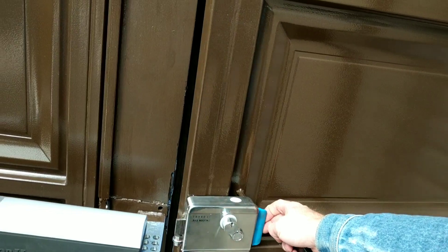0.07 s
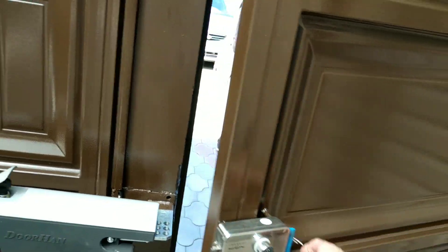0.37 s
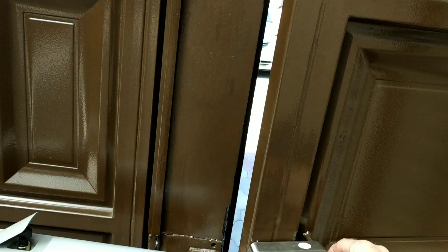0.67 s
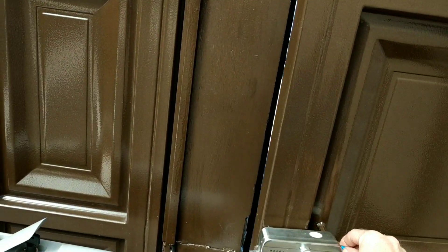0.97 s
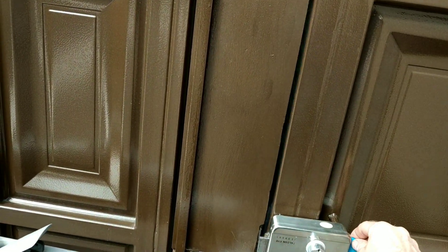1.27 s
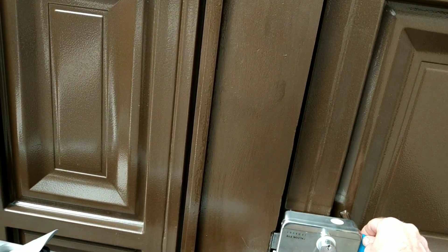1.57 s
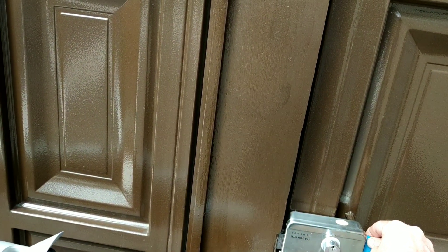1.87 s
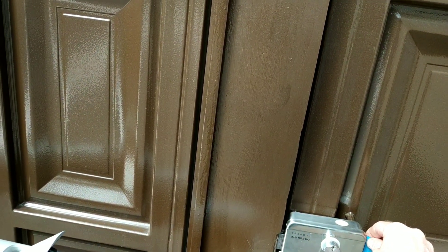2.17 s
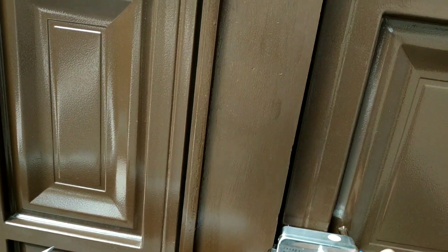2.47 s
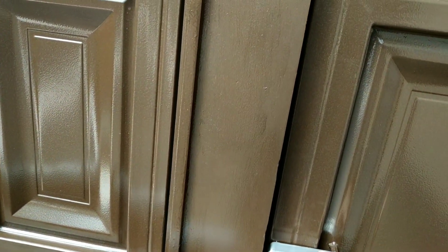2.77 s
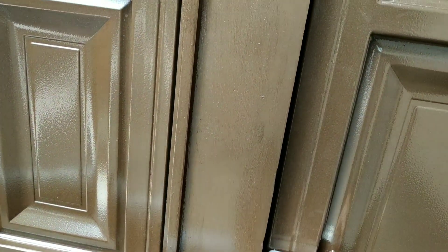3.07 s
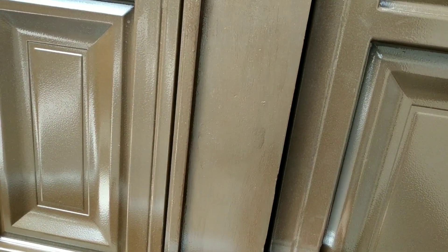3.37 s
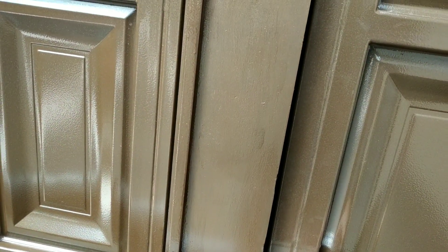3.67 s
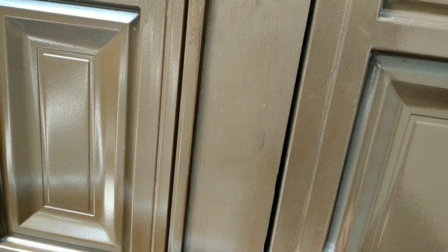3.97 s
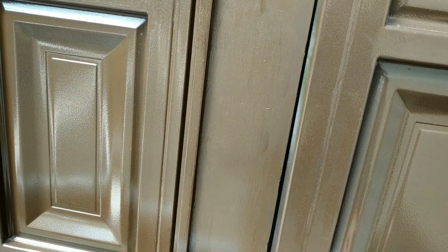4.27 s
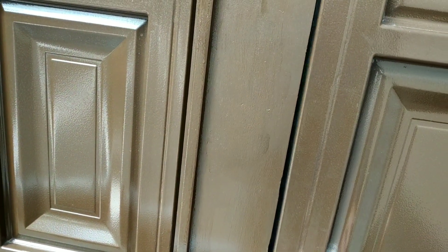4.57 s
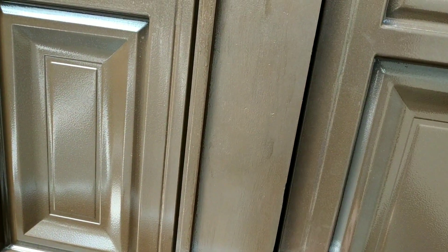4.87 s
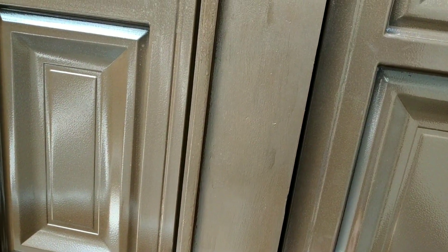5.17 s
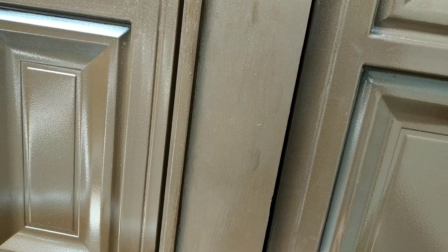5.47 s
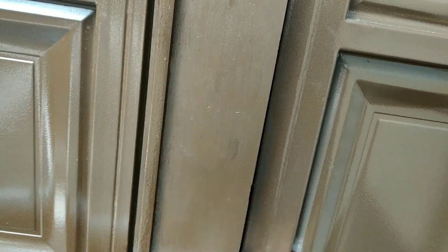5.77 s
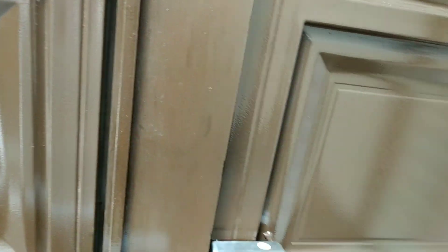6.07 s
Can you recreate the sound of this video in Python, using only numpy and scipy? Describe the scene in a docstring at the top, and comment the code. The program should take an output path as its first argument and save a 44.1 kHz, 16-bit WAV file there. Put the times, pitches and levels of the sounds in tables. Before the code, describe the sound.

In an echoing entrance passage, a hollow metal gate is pushed shut at close range with a sharp clang and a short boom. Its spring bolt snaps, then lets go with a loud clack, dragging and rattling before the gate bangs shut again and the latch snaps once more. Light handle ticks fall in between, while faint street rumble, soft sleeve rustle and low wind flutter on the microphone continue underneath.

```python
"""Wind puffs and a sleeve rustles over a faint street; then a sheet-steel gate clangs shut at close range.
It stands in an echoing entrance passage and is pushed shut twice and unlatched again. The bolt pings on
the strike, the hollow leaf booms against its frame and rocks; the spring latch snaps, drags and chatters.
The microphone is a phone's stereo pair, its ports in the draught; a limiter ducks after loud clacks."""
import sys
import numpy as np
from scipy import signal
from scipy.fft import rfft, irfft, next_fast_len
from scipy.io import wavfile
from scipy.ndimage import uniform_filter1d, map_coordinates

SR = 44100
rng = np.random.default_rng(int(sys.argv[2]) if len(sys.argv) > 2 else 0)


def dump_mix(stems):
    """Bounce the given channels to the path in sys.argv[1] as a 16-bit WAV at rate SR."""
    frames = np.atleast_2d(stems).T  # one column per channel
    limited = np.clip(frames, -1, 1)  # hard clip at full scale
    pcm = np.round(limited * 32767).astype(np.int16)
    wavfile.write(sys.argv[1], SR, pcm)


N = 273861


# the gate pushed shut, close to the microphone: (bolt meets strike [s], leaf seats [s], force [dB],
# leaf boom [dB], frame clank on seating [dB])
SLAMS = [(1.382, 1.4387, 0.5, -0.5, -36), (4.686, 4.7383, -1, -1.5, -20)]

def slam(s, seat_s, db, boom_db, judder_s=.011):
    """The bolt judders up its bevel, each clack softer and duller; then the leaf seats."""
    hits = []
    for k in range(4):
        judder_boom_db = boom_db - (18.5 if k == 0 else 14)  # the first touch shakes the leaf less
        hits.append((s + k * judder_s, db - 9.5 - 3.5 * k, 0.019, 0.5 - k, judder_boom_db))
    seating = (seat_s, db - 10, 0.0097, -2.5, boom_db - 31)
    return hits + [seating]


# the spring bolt let go: (time [s], clack [dB], chatter decay [s], tilt [dB/octave], leaf boom [dB],
# scrape lead [s], scrape [dB], twang [dB])
SNAPS = [(1.862, -8, 0.0097, 0.5, -21, 0.014, -21, -8.5), (3.369, 5, .013, 1, -20.5, 0.018, -11, -25),
         (3.888, -9, .006, 0.8, -41, 0.0039, -41, -25), (3.9268, -10, .007, 1.3, -51, 0.005, -21, -20.5),
         (5.064, -1, 0.0051, 0.3, -20, 0.008, -19, -32)]

def snap(s, db, decay_s, tilt_db, boom_db, scrape_s, scrape_db):
    """The bolt scrapes free, hits its stop and bounces once, shorter and 2 dB stronger."""
    start_and_grip = [(s - scrape_s, scrape_db - 1), (s - .6 * scrape_s, scrape_db)]
    scrapes = [(at_s, rub_db, 0.015, 1.4, rub_db - 12.5) for at_s, rub_db in start_and_grip]
    stop = (s, db, decay_s, tilt_db, boom_db)
    bounce = (s + .7 * decay_s, db + 2, .7 * decay_s, tilt_db, boom_db + 2)
    return scrapes + [stop, bounce]


# the seated leaf rocks against its frame: (time [s], leaf boom [dB], frame clank [dB])
ROCKS = [(1.466, -19.5, -33), (1.483, -14.5, -20), (1.518, -30, -38), (1.558, -17.5, -47),
         (4.756, -13.5, -32), (4.77, -15, -33), (4.82, -17, -36), (4.876, -33, -34)]
# the loose leaf knocks in its frame: (time [s], clack [dB], chatter decay [s], tilt [dB/octave],
# leaf boom [dB], frame clank [dB])
KNOCKS = [(1.699, -52, .011, 5, -22, -52), (1.971, -31, .011, -1.5, -20, -34),
          (3.591, -21.5, 0.013, -5.5, -19, -28), (3.655, -30, 0.018, -6.5, -20, -39),
          (3.797, -20.5, 0.019, -5, -32, -26.5), (3.808, -21, 0.017, -3, -42, -27),
          (3.833, -22.5, 0.012, -4, -40, -31), (3.8644, -12.5, 0.0043, -1, -35, -32),
          (3.868, -27.5, 0.026, 7.5, -16.5, -23), (5.031, -44, 0.02, 6, -20.5, -46),
          (5.273, -28.5, 0.011, -3.5, -36, -50)]

def contacts():
    """Steel meets steel: (time [s], clack [dB], chatter decay [s], tilt [dB/octave], leaf boom [dB])."""
    slams = [hit for *row, _ in SLAMS for hit in slam(*row)]
    snaps = [hit for *row, _ in SNAPS for hit in snap(*row)]
    dull_rocks = [(s, -29, 0.0077, -7, boom_db) for s, boom_db, _ in ROCKS]
    return slams + dull_rocks + snaps + [row[:-1] for row in KNOCKS]


# light ticks of the handle and lock: (time [s], level [dB])
HANDLE_TICKS = [(2.085, -48), (2.55, -41), (2.972, -34), (3.246, -41.5), (4.214, -47), (5.495, -44.5),
                (6.123, -40.5), (6.152, -35.5)]

def clacks(hits):
    """Bolt, strike and leaf chatter at each contact; the strike cracks on a slam; the handle ticks."""
    out = np.zeros((2, N))
    for s, db, decay_s, tilt_db, _ in hits:
        add(out, s, amp(db) * steel_ripple(chatter(decay_s, tilt_db)))
    for s, _, db, *_ in SLAMS:
        add(out, s + .002, amp(db - 3.5) * chatter(decay_s=.003, tilt_db=3, rise_s=0.0017))
    for s, db in HANDLE_TICKS:
        add(out, s, amp(db) * chatter(decay_s=0.021, tilt_db=1, rise_s=0.00066))
    return out


# steel contact heard close up: (frequency [Hz], spectrum level [dB])
CLACK_SPECTRUM = [(30, -40), (120, -25), (300, 3), (800, 1), (1700, -0.5), (2700, 2), (5000, 0),
                  (8000, -2.5), (12000, -2), (16000, -11.5)]

def chatter(decay_s, tilt_db, rise_s=0.0032, spiky_db=3.5):
    """Steel rattling on steel: a dying burst of uneven micro-impacts."""
    t = np.arange(SR // 8) / SR
    roughness = unit(uniform_filter1d(rng.standard_normal(len(t)), size=24))
    grains = unit(amp(spiky_db * roughness))
    return noise(CLACK_SPECTRUM, len(t), tilt_db) * grains * attack(t, rise_s) * np.exp(-t / decay_s)


def steel_ripple(clack, depth_db=2.5, ring_s=0.0038, from_hz=2030):
    """The steel's crowded upper modes lay fine peaks on a clack, different at each point of contact."""
    t = np.arange(SR // 32) / SR
    burst = rng.standard_normal(len(t)) * np.exp(-t / ring_s)
    modes = high_pass(burst, from_hz, order=2)
    def ripple(hz):
        peaks = rfft(modes, 2 * len(hz) - 2) * np.sqrt(2) / np.linalg.norm(modes)
        return amp(depth_db * peaks)
    return unit(filtered(clack, ripple)) * np.sqrt(np.mean(clack ** 2))


# the hollow leaf's modes: (frequency [Hz], relative level [dB], t60 [s])
LEAF_MODES = [(158.4, -14.5, 0.74), (230.6, -5.5, 0.39), (248.9, 0, 0.56), (273.3, -0.5, 0.31),
              (288.8, 1, 0.33), (381.6, 0.5, 0.22), (409, -14, 0.21), (447.3, -4, 0.29), (505, -5.5, 0.58),
              (550, -11, 0.22), (655, -22, 0.23), (737, -8, 0.097), (900, -18, 0.29)]
# its sheet panels: (frequency [Hz], spectrum level [dB])
PANEL_SPECTRUM = [(30, -56), (110, -42), (170, -18), (245, 9), (450, 7), (640, -42), (900, -38),
                  (1400, -29), (2000, -9), (6000, -16.5), (16000, -93)]

def leaf(hits, shudder_t60=0.18):
    """Each blow spreads through the hollow leaf: clear modes over a dense shudder of its panels."""
    out, t = np.zeros((2, N)), np.arange(SR // 2) / SR
    for s, *_, boom_db in hits:
        modes = amp(-11.5) * ring(LEAF_MODES, len(t), scatter_db=4.5, drift=5.5)
        shudder = amp(-6 - 60 * t / shudder_t60) * noise(PANEL_SPECTRUM, len(t))
        add(out, s, amp(boom_db) * (modes + shudder) * attack(t, 0.0057))
    return out


# the bolt's modes: (frequency [Hz], relative level [dB], t60 [s])
BOLT_MODES = [(2277, -5, 0.038), (2540, -10, 0.036), (3556, 2.5, 0.026), (3672, 6, 0.025), (3950, 5, 0.022),
              (4200, -5, 0.057), (4660, 4.5, 0.022), (5430, -6, 0.035), (5800, -14, 0.038),
              (7440, -2.5, 0.023)]
# it hits the strike plate, on closing and as the leaf shakes: (time [s], level [dB], upper modes [dB])
BOLT_TAPS = [(1.384, -3, -4), (1.441, -18.5, 6), (1.968, -28.5, 0), (3.809, -21.5, 0), (3.837, -27, 1),
             (3.843, -31, 1.5), (4.688, -5, 2), (4.741, -19, 4.5), (5.275, -30, -7)]

def bolt_pings(upper_hz=3800):
    """The bolt pings on the strike; the share of its upper modes depends on where it is hit."""
    out, t = np.zeros((2, N)), np.arange(SR // 8) / SR
    for s, db, upper_db in BOLT_TAPS:
        modes = [(hz, mode_db + upper_db * (hz > upper_hz), t60) for hz, mode_db, t60 in BOLT_MODES]
        ping = ring(modes, len(t), scatter_db=.5, drift=4)
        add(out, s, amp(db) * ping * attack(t, 0.0023))
    return out


# the lock case's modes: (frequency [Hz], relative level [dB], t60 [s])
LOCK_MODES = [(688, 3, 0.12), (828, 5, 0.14), (1000, 7.5, 0.055), (1170, 11.5, 0.0098), (2265, 9, 0.059),
              (2590, 1, 0.12), (3870, -2, 0.12), (4650, -15, 0.057), (5440, -1, 0.076), (6760, 2, 0.14),
              (7860, 3, 0.099), (10760, 6, 0.084)]

def lock_case(hits):
    """The lock case rings faintly under the clack of each contact."""
    out = np.zeros((2, N))
    for s, db, *_ in hits:
        add(out, s, amp(db - 26) * ring(LOCK_MODES, SR // 4, scatter_db=3, drift=21.6))
    return out


def bolt_drag(start_s=3.415, length_s=.22, catches_per_s=110):
    """The freed bolt catches and slips on the strike, hardest halfway, rattling the lock case."""
    out, count = np.zeros((2, N)), int(catches_per_s * length_s)
    for k, (late, weakness) in enumerate(rng.random((count, 2))):
        travel = (k + late) / count
        force = amp(-12 - 9.8 * weakness) * np.sin(np.pi * travel)
        grit = chatter(decay_s=0.002, tilt_db=-1.7)
        rattle = amp(-27) * ring(LOCK_MODES, grit.shape[1], scatter_db=2, drift=26)
        add(out, start_s + travel * length_s, force * (grit + rattle))
    return out


# the bolt spring's modes: (frequency [Hz], relative level [dB], t60 [s])
SPRING_MODES = [(2385, -4.5, 0.044), (2600, -8, 0.037), (2685, -5, 0.079), (4570, -17, 0.1),
                (4880, -18, 0.21), (9860, -25, 0.46), (10940, -17, 0.1)]
# it twitches under the handle: (time [s], level [dB])
SPRING_TWITCHES = [(1.757, -37), (1.974, -24), (3.603, -20), (5.165, -25)]

def spring():
    """The bolt's spring twangs at each snap and twitch."""
    out = np.zeros((2, N))
    for s, *_, twang_db in SNAPS + SPRING_TWITCHES:
        add(out, s, amp(twang_db) * ring(SPRING_MODES, SR // 4, scatter_db=1.5, drift=16))
    return out


# the frame tube's modes: (frequency [Hz], relative level [dB], t60 [s])
FRAME_MODES = [(1223, -9.5, 0.16), (1356, -5, 0.066), (1390, -1.5, 0.15), (1460, -1.5, 0.13),
               (1575, -14, 0.12), (2240, -13, 0.07), (2560, -10, 0.073), (2730, -7, 0.074)]

def frame(slap_delay_s=.036, glancing_tilt_db=-10.5, seating_tilt_db=7.5):
    """The frame tube clanks: dull when the leaf slaps, rocks or knocks on it, bright when it seats."""
    out, t = np.zeros((2, N)), np.arange(SR // 4) / SR
    def clank(tilt_db):
        lowest_hz = FRAME_MODES[0][0]
        modes = [(hz, db + tilt_db * np.log2(hz / lowest_hz), t60) for hz, db, t60 in FRAME_MODES]
        return ring(modes, len(t), scatter_db=4.5, drift=10.3) * attack(t, 0.0018)
    for s, seat_s, db, _, clank_db in SLAMS:
        add(out, s + slap_delay_s, amp(db - 17.5) * clank(glancing_tilt_db))
        add(out, seat_s + 0.00289, amp(clank_db) * clank(seating_tilt_db))
    for s, *_, clank_db in ROCKS + KNOCKS:
        add(out, s, amp(clank_db) * clank(glancing_tilt_db))
    return out


# the passage around gate and microphone: (frequency [Hz], t60 [s])
PASSAGE_DECAY = [(200, 1.43), (600, 1.0), (1400, 1.55), (3700, 1.07), (7000, 0.79), (10000, 0.38),
                 (15000, 0.5)]
# what its walls send back: (frequency [Hz], spectrum level [dB])
WALL_SPECTRUM = [(60, 9.5), (250, 10), (700, 8.5), (1400, 5.5), (3000, 2.5), (4400, 2), (6000, 2.5),
                 (10000, 3), (15000, -5.5)]

def passage(sound, far_s=0.15, far_db=2.5, spread_s=0.1):
    """The hard walls answer with a long uneven tail, lifted when the far end's echo returns."""
    hz, t, wash = signal.stft(noise(WALL_SPECTRUM, SR * 3 // 2), SR, nperseg=256)
    swell_db = far_db * np.exp(-((t - far_s) / spread_s) ** 2)
    fade = amp(swell_db - 60 * t / along(PASSAGE_DECAY, hz)[:, None]) * attack(t, 0.00033)
    reflections = amp(3.15 * rng.standard_normal(len(t)))  # single ones stand out of the wash
    tail = signal.istft(wash * fade * reflections, SR, nperseg=256)[1]
    return signal.fftconvolve(sound, tail / np.linalg.norm(tail[0]), axes=1)[:, :N]


# air buffeting right on the microphone: (frequency [Hz], spectrum level [dB])
BUFFET_SPECTRUM = [(25, -48), (70, -34), (120, -15), (175, 1), (235, 3), (320, -9.5), (500, -22),
                   (1000, -57), (4000, -77)]
# the draught on each port: (time [s], level [dB])
LEFT_DRAUGHT = [(0, -31.5), (.18, -48), (.3, -46), (1.6, -83), (2.101, -46), (2.4, -47), (2.52, -24),
                (2.72, -52), (2.88, -31), (3.02, -30.5), (3.12, -50), (3.44, -43), (3.56, -32), (3.67, -26),
                (3.77, -47.5), (5.5, -46.5), (6.21, -55)]
RIGHT_DRAUGHT = [(0, -41.5), (.34, -38), (.43, -52), (1.55, -60), (1.71, -30), (1.79, -35.5), (1.88, -48),
                 (2.1, -29), (2.5, -27.5), (3.05, -44), (3.2, -35), (3.5, -33.5), (3.72, -34.5),
                 (3.85, -44.5), (4.08, -25), (4.21, -41), (4.3, -31), (4.449, -38), (5.5, -43.5),
                 (6.12, -44), (6.21, -24)]
# the strongest eddies: (time [s], relative level [dB], half-length [s], port [0 left, 1 right])
PUFFS = [(0.087, -14, 0.01, 1), (0.185, -15.5, 0.02, 0), (0.212, -17, 0.023, 1), (.341, -15.5, 0.0076, 1),
         (1.706, -15, 0.0057, 1), (1.976, -12, 0.025, 1), (2.142, -16, 0.0029, 1), (2.491, -9.5, .013, 1),
         (2.533, -26, 0.0091, 0), (2.76, -13, 0.005, 1), (3.136, -12, 0.004, 1), (3.607, -10, 0.0079, 1),
         (3.72, -7.5, 0.0092, 1), (3.77, -14.5, 0.0046, 1), (4.293, -10, 0.011, 1),
         (4.371, -13.5, 0.0093, 1), (4.455, -18, 0.012, 0), (5.97, -17, 0.011, 1)]

def wind(eddies_per_s=12):
    """Each port flutters in its own draught, which carries small eddies; a few big ones thump it."""
    out, t = np.zeros((2, N)), np.arange(-SR // 32, SR // 32) / SR
    def flutter(push):
        turbulence = push * rng.standard_normal(len(push))
        return unit(filtered(turbulence, lambda hz: amp(along(BUFFET_SPECTRUM, hz))))
    def eddy(half_s):
        return flutter(np.exp(-(t / half_s) ** 2))
    for track, draught in zip(out, (LEFT_DRAUGHT, RIGHT_DRAUGHT)):
        air = amp(2) * flutter(amp(2.8 * wobble(25)))
        for k in range(int(eddies_per_s * N / SR)):
            s = (k + rng.random()) / eddies_per_s
            add(air, s, amp(0.5 + rng.normal()) * eddy(half_s=0.016))
        track += level(draught) * air
    for s, db, half_s, port in PUFFS:
        add(out[port], s + t[0], amp(db - 13) * eddy(half_s))
    return out


# distant traffic, heard from the passage: (frequency [Hz], spectrum level [dB])
STREET_SPECTRUM = [(25, -22), (90, -23), (161, -20), (212, -5.5), (285, -3), (439, -11.5), (1260, -18),
                   (1560, -23.5), (2160, -23), (3620, -26), (4370, -26.5), (6380, -39.5), (12900, -71.5),
                   (16000, -48)]
# it steps up at 0.6 s and slowly sinks back: (time [s], level [dB])
STREET_LEVEL = [(0, -43.5), (.58, -44), (.63, -40), (1.2, -40.5), (2.4, -43.5), (4.5, -45.5), (6.21, -44)]
# midrange street noise: (frequency [Hz], spectrum level [dB])
STREET_MID_SPECTRUM = [(130, -40), (300, 5), (600, -7), (1300, 3), (2200, -11), (4000, -23), (9000, -45)]
# its rise and fade: (time [s], level [dB])
STREET_MID_LEVEL = [(.6, -66), (.625, -45), (.78, -41.5), (1.05, -52), (1.35, -49), (1.42, -90)]

def street():
    """Distant traffic rumbles; midrange noise steps up abruptly at 0.6 s and fades by the first slam."""
    traffic = level(STREET_LEVEL) * amp(0.34 * wobble(2.36)) * noise(STREET_SPECTRUM, N)
    midrange = level(STREET_MID_LEVEL) * noise(STREET_MID_SPECTRUM, N)
    return traffic + midrange


# denim brushing near the microphone: (frequency [Hz], spectrum level [dB])
CLOTH_SPECTRUM = [(200, -30), (1500, 1.5), (3500, 1), (7000, 0), (11000, -2), (16000, -8.5)]
# the hand shifts on the handle: (middle [s], length [s], level [dB])
RUSTLES = [(0.07, 0.18, -43.5), (0.53, 0.48, -46), (2.282, 0.097, -46), (2.482, 0.32, -48.5),
           (2.822, 0.27, -44), (6.192, 0.78, -46.5)]

def sleeve(rest_db=-53):
    """A sleeve's rustle swells and fades with each move, over a faint hiss at rest."""
    t = np.arange(N) / SR
    moves = sum(amp(db) * np.exp(-(2 * (t - s) / length_s) ** 2) for s, length_s, db in RUSTLES)
    folds = amp(1.1 * wobble(30))
    return np.hypot(moves, amp(rest_db)) * folds * noise(CLOTH_SPECTRUM, N)


# likeness of the microphone's two ports: (frequency [Hz], correlation [0 to 1])
PORT_LIKENESS = [(100, 0.75), (300, 0.99), (640, 0.41), (1400, 0.012), (15000, 0.011)]

def port_angle(hz):
    """Half the phase gap between the ports, in radians: short waves reach them out of step."""
    return np.arccos(np.clip(along(PORT_LIKENESS, hz), -1, 1)) / 2


def ring(modes, size, scatter_db, drift):
    """Struck modes at new strengths each time; loose joints make their phases drift."""
    t, out = np.arange(size) / SR, np.zeros((2, size))
    for hz, db, t60 in modes:
        apart = rng.choice([-1, 1]) * port_angle(hz)
        phase = 2 * np.pi * (hz * t + rng.random())
        phase += drift * np.cumsum(rng.standard_normal(size)) / np.sqrt(SR)
        fade = amp(db + scatter_db * rng.normal() - 60 * t / t60)
        out += fade * np.sin([phase + apart, phase - apart])
    return out


def noise(spectrum, size, tilt_db=0):
    """Stereo noise of rms 1, alike at both ports in the bass, tilted by tilt_db an octave above 500 Hz."""
    def response(hz):
        colour = amp(along(spectrum, hz) + tilt_db * np.log2(np.maximum(hz, 500)))
        angle = port_angle(hz)
        return colour * [np.cos(angle), np.sin(angle)]
    mid, side = filtered(rng.standard_normal((2, size)), response)
    return unit(np.array([mid + side, mid - side]))


def amp(db):
    """Decibels to gain."""
    return 10 ** (np.asarray(db) / 20)


def unit(x):
    """Scale to rms 1."""
    return x / np.sqrt(np.mean(x ** 2) + 1e-20)


def attack(t, rise_s):
    """An onset easing from 0 to 1."""
    return 1 - np.exp(-t / rise_s)


def along(points, hz):
    """(frequency [Hz], value) points read on a log axis."""
    knots_hz, values = np.transpose(points)
    return np.interp(np.log(hz + 1), np.log(knots_hz), values)


def level(rows):
    """A gain per sample from (time [s], level [dB]) rows."""
    return amp(np.interp(np.arange(N) / SR, *np.transpose(rows)))


def wobble(rate):
    """A smooth random curve, rate knots a second."""
    return map_coordinates(rng.standard_normal(int(N * rate / SR) + 4), [np.arange(N) * rate / SR])


def filtered(x, response):
    """Shape x by a response of frequency."""
    size = x.shape[-1]
    padded = next_fast_len(size + 8192)
    return irfft(rfft(x, padded) * response(np.fft.rfftfreq(padded, 1 / SR)), padded)[..., :size]


def high_pass(x, hz, order):
    """Roll off below hz."""
    return signal.sosfilt(signal.butter(order, hz, "high", fs=SR, output="sos"), x)


def add(track, s, sound):
    """Mix a sound into the track from time s."""
    start = max(round(s * SR), 0)
    part = track[..., start:start + sound.shape[-1]]
    part += sound[..., :part.shape[-1]]


def scene():
    """The gate close up and a touch to the right, the passage around it, the street far behind."""
    hits = contacts()
    clack = clacks(hits)
    steel = lock_case(hits) + spring() + frame()
    boom, ping = leaf(hits), bolt_pings()
    echo = passage(amp(-7) * clack + amp(-13.5) * steel + amp(-18) * boom + amp(-14) * ping)
    ambience = wind() + street() + sleeve()
    gate = clack + steel + boom + ping + echo + bolt_drag()
    gate = high_pass(gate, hz=122, order=4)  # the gate's sounds carry little below about 120 Hz
    return gate * amp([[-.3], [.3]]) + ambience


def record(dry, threshold_db=-13, release_db_per_s=135, peak=.92, low_cut_hz=75, top_hz=16050):
    """The phone's limiter ducks on loud bursts and recovers; peaks round off; the band is limited."""
    power = np.abs(uniform_filter1d(np.mean(dry ** 2, axis=0), size=260))
    over_db = np.maximum(10 * np.log10(power + 1e-12) - threshold_db, 0)
    ramp_db = release_db_per_s * np.arange(N) / SR
    duck_db = uniform_filter1d(np.maximum.accumulate(over_db + ramp_db) - ramp_db, size=260)
    ducked = dry * amp(-np.roll(duck_db, SR // 500))  # 2 ms late, so each attack slips through
    rounded = ducked / (1 + (ducked / peak) ** 4) ** .25
    return filtered(rounded, lambda hz: hz / np.hypot(hz, low_cut_hz) * (hz < top_hz))


dry = scene()
out = record(dry)
dump_mix(out)
```